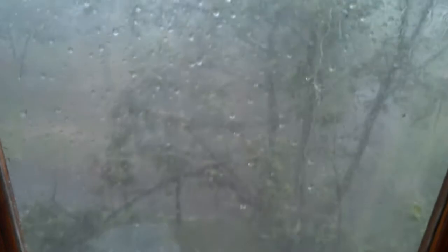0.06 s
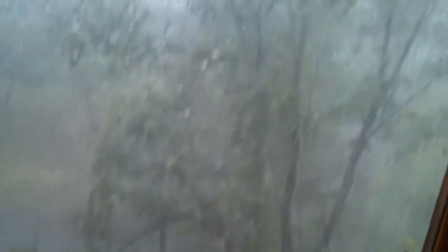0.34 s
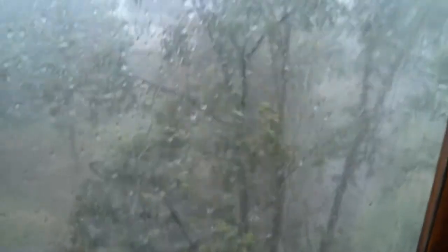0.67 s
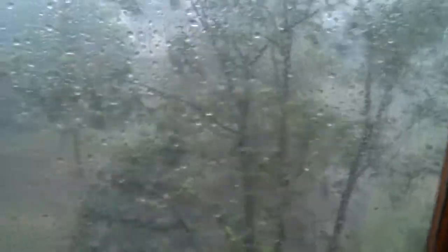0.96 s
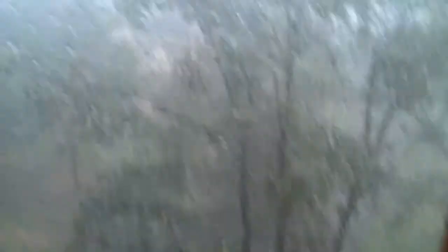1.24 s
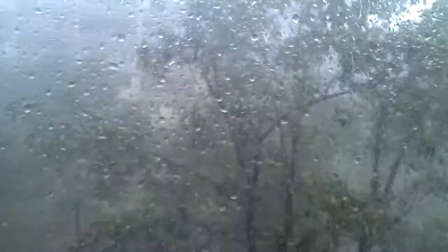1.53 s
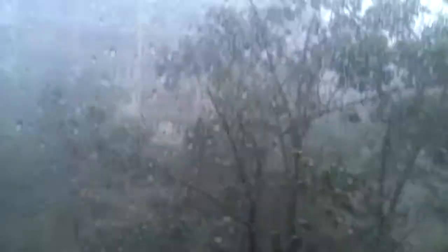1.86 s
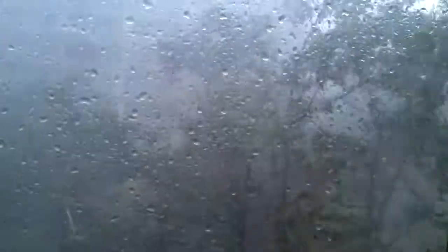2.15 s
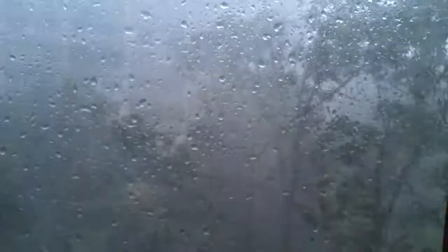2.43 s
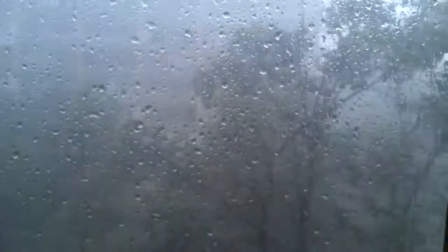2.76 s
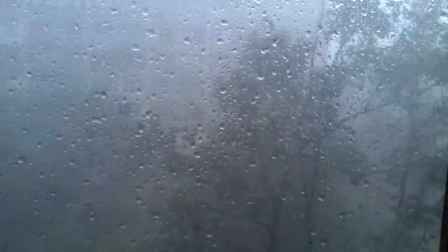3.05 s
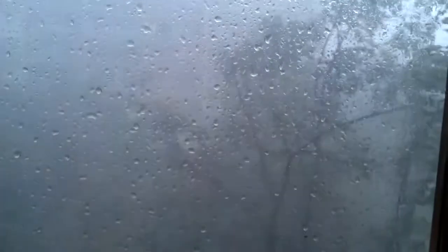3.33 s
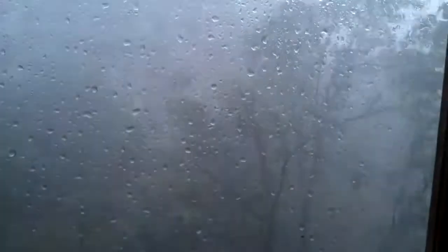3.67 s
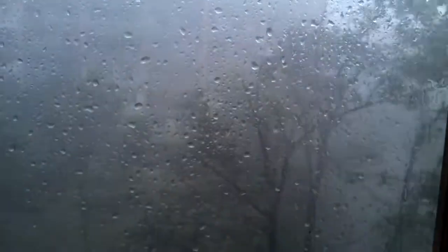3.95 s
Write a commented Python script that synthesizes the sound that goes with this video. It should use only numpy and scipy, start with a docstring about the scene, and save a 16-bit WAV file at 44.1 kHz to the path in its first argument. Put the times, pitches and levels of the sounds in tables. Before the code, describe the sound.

Gusts fling rain against a window pane while stormy wind roars through trees outside.

```python
"""A room behind a window, in a storm. Gusts fling sprays of drops at the pane over a steady
patter; a few big drops tap it, and the glass rings briefly under the hardest. Outside, rain and
thrashing leaves make a wide wash above the wind's low roar. The room adds a short echo to the
pane, and the hardest hits overload the microphone."""
import sys
import numpy as np
from scipy import signal
from scipy.fft import rfft, irfft
from scipy.io import wavfile
from scipy.ndimage import uniform_filter1d

SR = 44100
rng = np.random.default_rng(int(sys.argv[2]) if len(sys.argv) > 2 else 0)


def master_out(mix):
    """Clip the mix to full scale and print it as 16-bit PCM to the path in sys.argv[1]."""
    frames = np.transpose(np.atleast_2d(mix))
    ceiling = np.clip(frames, -1, 1)
    pcm = np.round(ceiling * 32767).astype(np.int16)
    wavfile.write(sys.argv[1], SR, pcm)


N = 176400

# Sprays thrown at the pane: start_s, rise_s, hold_s, level_db
SPRAYS = [(0, 0.00061, 0.0032, 0.5), (0.111, 0.005, 0.012, -4.5), (0.143, 0.008, 0.058, -2),
          (0.251, 0.012, 0.02, -4.5), (0.412, 0.0022, 0.03, 1.5), (0.508, 0.0026, 0.0064, -2.5),
          (0.755, 0.018, 0.023, -8.5), (0.831, 0.0018, 0.012, -0.5), (0.931, 0.023, 0.025, 2),
          (1.109, 0.0095, 0.03, 1.5), (1.315, .002, 0.0051, -3.5), (1.367, 0.0061, 0.0066, -7.5),
          (1.511, 0.0054, 0.0058, -8.5), (1.588, 0.006, 0.012, -9), (1.645, .002, 0.0084, 0.5),
          (1.753, 0.0071, 0.014, -8.5), (1.816, 0.037, 0.0094, -2), (1.939, 0.007, 0.0083, -10),
          (2.125, 0.0077, 0.016, -1), (2.862, 0.027, 0.024, -3.5), (2.938, .004, 0.0091, -4.5),
          (3.066, 0.04, 0.022, -1), (3.18, 0.001, 0.009, -1.5), (3.234, 0.0065, 0.032, -6.5),
          (3.282, 0.023, 0.047, 4.5), (3.367, .008, 0.068, 3), (3.464, 0.0037, .008, -2),
          (3.508, 0.0077, 0.015, -3.5), (3.555, .003, 0.022, 1.5), (3.64, 0.001, 0.038, -1.5),
          (3.771, 0.0038, 0.0042, -5), (3.885, 0.001, 0.015, -1), (3.935, 0.036, 0.026, -4)]
# Splash on glass: freq_hz, density_db
SPLASH_SPECTRUM = [(100, -48), (300, -25), (750, -16), (1600, -18), (2700, -17.5), (3900, -9), (5000, -8.5),
                   (6750, 2), (7400, -2), (8050, -1.5), (9000, -12), (10700, -23.5), (15000, -52)]
# Splash balance by band: freq_hz, left_over_right_db
SPLASH_BALANCE = [(4000, -0.5), (6650, 3.5), (7300, -3), (8000, -9), (10000, -6.5)]
# Wet slap under the splash: freq_hz, density_db
SLAP_SPECTRUM = [(150, -40), (1200, -2.5), (3000, -2), (4500, -1), (9000, -41), (13000, -60)]
# Slap against splash, before its onset boost: time_s, level_db
SLAP_LEVEL = [(0, -10), (.13, -29), (.45, -10), (.8, -20), (2.1, -21.5), (3.3, -25.5)]
def sprays(level_db=-2, front_s=0.0015, fall_db_per_s=418, slap_boost_db=5.5, slap_boost_s=0.023):
    """A gust's drops land, swell, hold and trail off; the heaviest come first and slap hardest."""
    t = np.arange(N) / SR
    splash_power, slap_power = np.zeros((2, N))
    for start_s, rise_s, hold_s, spray_db in SPRAYS:
        age_s = np.maximum(t - start_s, 0)
        front = np.clip(age_s / front_s, 0, 1)
        swell = np.clip(age_s / rise_s, 0, 1)
        fall_db = fall_db_per_s * np.maximum(age_s - rise_s - hold_s, 0)
        load = 0.5 * (front + swell) * amp(spray_db - fall_db)
        splash_power += load ** 2
        slap_power += (load * amp(slap_boost_db * np.exp(-age_s / slap_boost_s))) ** 2
    hits = drops(rate_per_s=7000, spread_db=3)
    hits = flicker(hits, depth_db=1.74, span_frames=6, span_bins=12)
    splash = np.sqrt(splash_power) * coloured(hits, SPLASH_SPECTRUM, SPLASH_BALANCE)
    slap = np.sqrt(slap_power) * amp(curve(SLAP_LEVEL)) * coloured(hits, SLAP_SPECTRUM)
    return amp(level_db) * (splash + slap)


# Single big drops: start_s, level_db, ring_hz, ring_over_splash_db, left_over_right_db
TAPS = [(0.603, -13.5, 7050, -4, -2), (.722, -11.5, 7800, -1, -2), (1.085, -5, 7900, 0, -4),
        (2.113, -10.5, 6800, 1, 6), (2.218, -15.5, 6700, -2, -4), (2.2254, 5, 6650, -7.5, 1.5),
        (2.356, -5.5, 6560, 7, 4)]
def taps(rise_s=0.0005, hold_s=0.0033, t60_s=0.044, ring_width_hz=510):
    """A big drop bursts on the glass: a splash with a brief narrow-band ring."""
    t = np.arange(N) / SR
    freq_hz = np.fft.rfftfreq(N, 1 / SR)
    splash = coloured(noise(), SPLASH_SPECTRUM)
    out = np.zeros((2, N))
    for start_s, level_db, ring_hz, ring_db, balance_db in TAPS:
        resonance = 1 / (1 + (2 * (freq_hz - ring_hz) / ring_width_hz) ** 2)
        ring = unit_rms(irfft(rfft(noise()) * resonance, N))
        rise = np.clip((t - start_s) / rise_s, 0, 1)
        fall = amp(-60 * np.maximum(t - start_s - hold_s, 0) / t60_s)
        out += rise * fall * amp(level_db) * pan(balance_db) * (splash + amp(ring_db) * ring)
    return out


# Window modes struck by the hardest drops: start_s, pitch_hz, level_db
KNOCKS = [(0.424, 1780, -14), (1.762, 1100, -13), (2.228, 4340, -2), (2.23, 2660, -13.5)]
def knocks(low_mode_t60_s=0.2, damping_hz=1500):
    """The window rings on one decaying mode per knock; higher modes die sooner."""
    t = np.arange(N) / SR
    out = np.zeros(N)
    for start_s, pitch_hz, level_db in KNOCKS:
        age_s = np.maximum(t - start_s, 0)
        t60_s = low_mode_t60_s / (1 + pitch_hz / damping_hz)
        out += amp(level_db - 60 * age_s / t60_s) * np.sin(2 * np.pi * pitch_hz * age_s)
    return out


# Steady rain on the pane: time_s, level_db
PATTER_LEVEL = [(0, -18.5), (.65, -17.5), (1.05, -14), (1.3, -17), (1.7, -16), (2.05, -21), (2.5, -18.5),
                (2.8, -17.5), (3, -14.5), (3.7, -13)]
def patter(flurries_per_s=16, flurry_decay_s=0.0097, flurry_db=2):
    """Small drops hit the pane; the level jumps as clumps arrive and sinks as they thin out."""
    arrivals = 1. * (rng.random(N) < flurries_per_s / SR)
    flurries = signal.lfilter([1], [1, -np.exp(-1 / (flurry_decay_s * SR))], arrivals)
    level_db = curve(PATTER_LEVEL) + flurry_db * np.minimum(flurries, 1.3)
    hits = flicker(drops(rate_per_s=2200, spread_db=0.5), depth_db=0.3)
    return amp(level_db) * coloured(hits, SPLASH_SPECTRUM, SPLASH_BALANCE)


def drops(rate_per_s, spread_db, spots=44, t60_s=0.011):
    """Drops of random size land on many spots of the pane, each with its own short ring."""
    size = amp(spread_db * np.minimum(rng.exponential(1, N), 4.5))
    impacts = size * (rng.random(N) < rate_per_s / SR)
    landing_spot = rng.integers(0, spots, N)
    out = np.zeros((2, N))
    for spot in range(spots):
        spot_impacts = impacts * (landing_spot == spot)
        out += signal.oaconvolve(spot_impacts[None], reflections(t60_s)[:, :1024], axes=1)[:, :N]
    return out


# Rain and leaves: freq_hz, density_db
WASH_SPECTRUM = [(100, -41), (300, -4.5), (480, -8.5), (640, 0.5), (760, 1), (950, -3), (1300, -4.5),
                 (2000, -3), (2800, -6), (4000, -2.5), (6000, -10.5), (8000, -14.5), (10000, -18),
                 (14000, -70)]
# Surges in the trees: time_s, level_db
WASH_LEVEL = [(0, -21), (.22, -18), (.35, -24.5), (.48, -17), (.63, -25), (.82, -21), (1.14, -18.5),
              (1.29, -22), (1.46, -21.5), (1.86, -20.5), (2.05, -26.5), (2.17, -22.5), (2.32, -27.5),
              (2.55, -25), (2.76, -25.5), (2.92, -21), (3.16, -17.5), (3.42, -23.5), (3.59, -19.5),
              (4, -20)]
def tree_wash(gain_db=4):
    """Heavy rain and thrashing leaves make a wide wash of noise."""
    return amp(gain_db + curve(WASH_LEVEL)) * coloured(flicker(noise(), depth_db=1.5), WASH_SPECTRUM)


# Wind roar: freq_hz, density_db
ROAR_SPECTRUM = [(25, -50), (60, -59), (100, -26), (150, -9), (210, 0), (300, 0), (380, -6), (480, -15),
                 (700, -12.5), (1000, -25), (2000, -39), (8000, -80)]
# Wind swells: time_s, level_db
ROAR_LEVEL = [(0, -32), (.65, -35), (1.12, -29), (1.7, -33.5), (2.7, -35.5), (3.1, -32.5), (4, -30)]
def wind_roar(gain_db=3.5):
    """Wind in the trees makes a low, slowly swelling roar."""
    return amp(gain_db + curve(ROAR_LEVEL)) * coloured(flicker(noise(), depth_db=1.5), ROAR_SPECTRUM)


# Likeness of left and right: freq_hz, correlation
STEREO_CORRELATION = [(150, 1), (500, 0.82), (850, 0.9), (1300, 0.33), (2050, -0.15), (2600, 0.36),
                      (4700, 0.26), (8000, 0.23), (11000, 0.089)]
def coloured(pair, spectrum, balance=None):
    """Gives two unrelated signals a spectrum, stereo correlation and balance, at rms 1."""
    freq_hz = np.fft.rfftfreq(N, 1 / SR)
    correlation = np.clip(over_log_hz(STEREO_CORRELATION, freq_hz), -.99, .99)
    mid, side = rfft(pair) * np.sqrt([1 + correlation, 1 - correlation])
    bins = np.array([mid + side, mid - side]) * amp(over_log_hz(spectrum, freq_hz))
    if balance:
        bins *= pan(over_log_hz(balance, freq_hz))
    return unit_rms(irfft(bins, N))


def flicker(pair, depth_db, span_frames=10, span_bins=9):
    """The level drifts in random patches of time and frequency."""
    cells = signal.stft(pair, nperseg=512)[2]
    drift = uniform_filter1d(rng.standard_normal(cells.shape[1:]), span_bins, axis=0)
    drift = unit_rms(uniform_filter1d(drift, span_frames, axis=1))
    return signal.istft(cells * amp(depth_db * drift), nperseg=512)[1][:, :N]


def reflections(t60_s):
    """A decaying burst of dense reflections, energy 1 per channel."""
    t = np.arange(SR // 2) / SR
    tail = rng.standard_normal((2, len(t))) * amp(-60 * t / t60_s)
    return tail / np.linalg.norm(tail, axis=1, keepdims=True)


def noise():
    """Stereo white noise."""
    return rng.standard_normal((2, N))


def amp(db):
    """Decibels to gain."""
    return 10 ** (np.asarray(db) / 20)


def pan(left_over_right_db):
    """Left and right gains."""
    return amp(np.array([[.5], [-.5]]) * left_over_right_db)


def unit_rms(x):
    """Scales to rms 1."""
    return x / np.sqrt(np.mean(x ** 2) + 1e-20)


def over_log_hz(points, freq_hz):
    """Interpolates a table over log frequency."""
    point_hz, value = np.transpose(points)
    return np.interp(np.log(freq_hz + 1), np.log(point_hz + 1), value)


def curve(points):
    """Interpolates a table over time, per sample."""
    return np.interp(np.arange(N) / SR, *np.transpose(points))


# Balance of sprays and patter: time_s, left_over_right_db
RAIN_PAN = [(1.1, 1.5), (1.6, 3.4), (4, 3.2)]
def scene(room_t60_s=0.12, room_db=-9):
    """The pane and its echo in the room, with the storm behind."""
    rain = (sprays() + patter()) * pan(curve(RAIN_PAN))
    pane = rain + taps() + knocks()
    echo = signal.oaconvolve(pane, reflections(room_t60_s), axes=1)[:, :N]
    return pane + amp(room_db) * echo + tree_wash() + wind_roar()


def record(dry):
    """The microphone soft-clips the peaks; a low-pass limits the band."""
    ceiling, knee, cutoff_hz = 0.95, 5.94, 15800
    clipped = dry / (4.5 + abs(dry / ceiling) ** knee) ** (1 / knee)
    lowpass = signal.firwin(511, cutoff_hz, window=("kaiser", 9), fs=SR)
    return signal.oaconvolve(clipped, lowpass[None], "same")


dry = scene()
out = record(dry)
master_out(out)
```